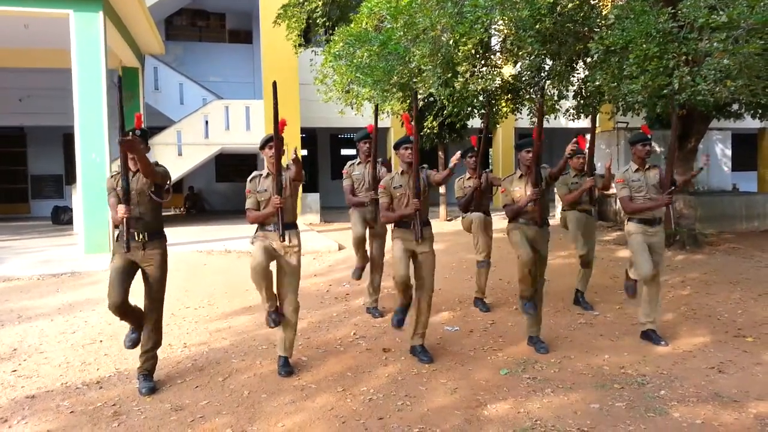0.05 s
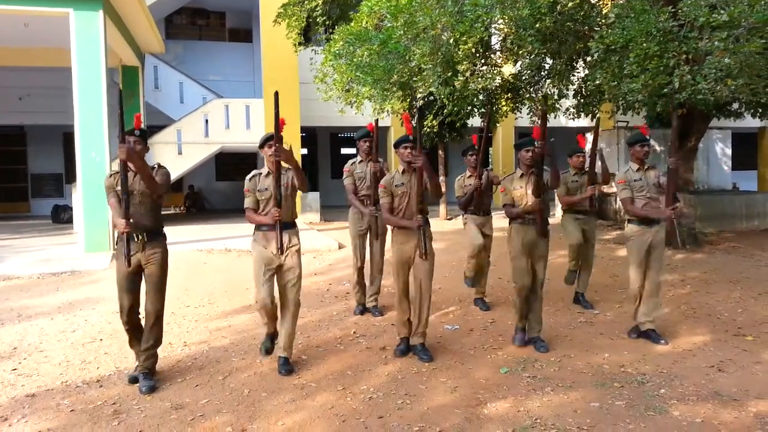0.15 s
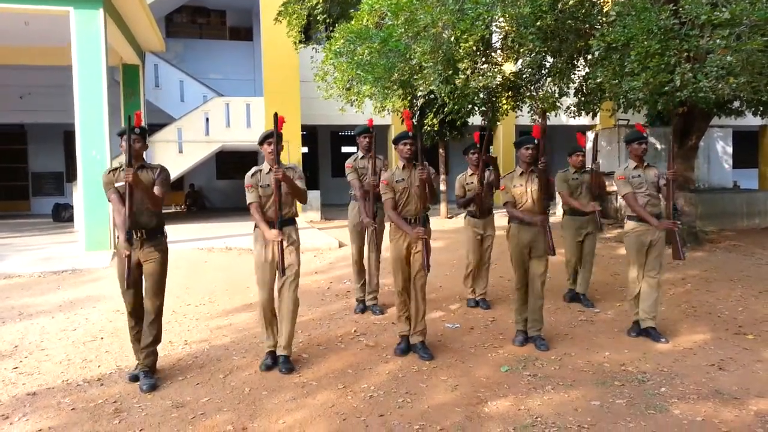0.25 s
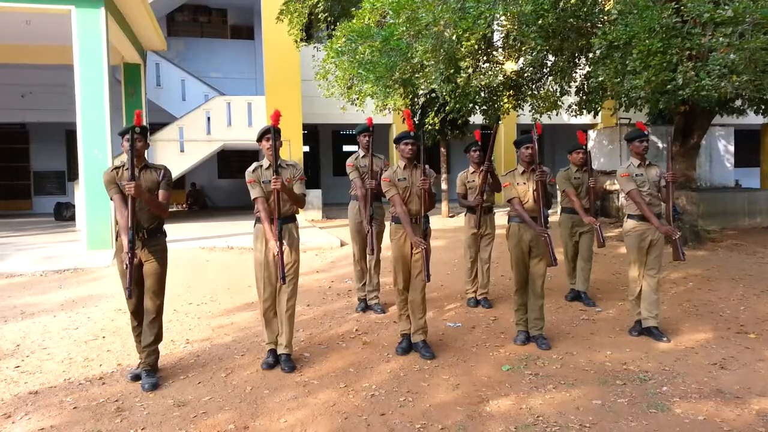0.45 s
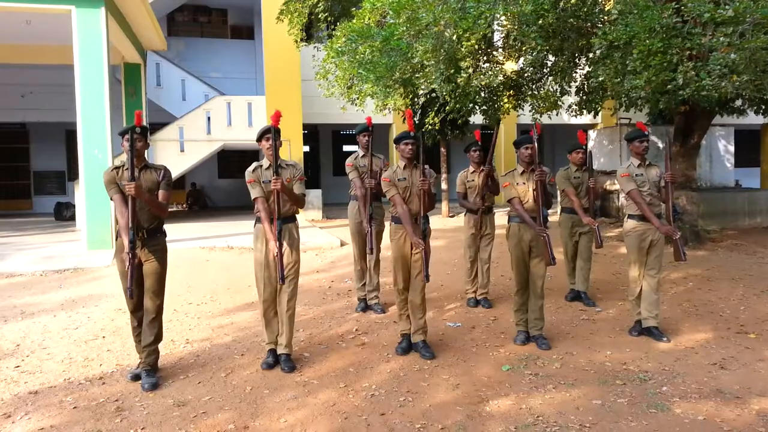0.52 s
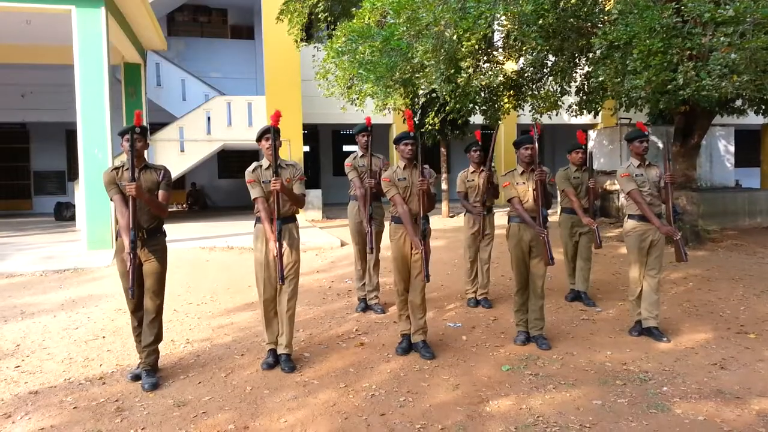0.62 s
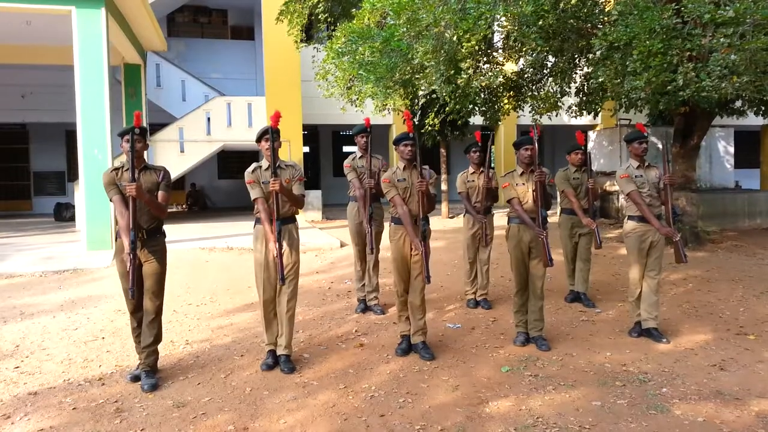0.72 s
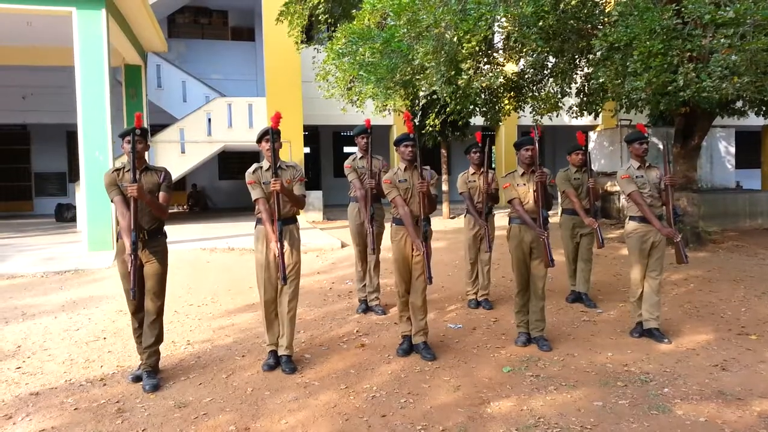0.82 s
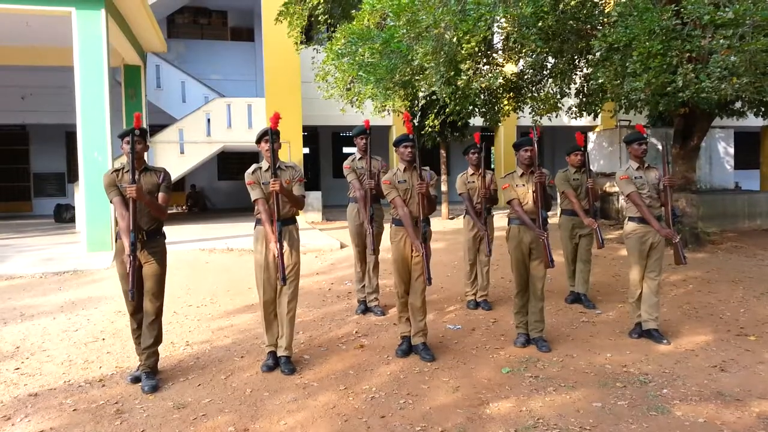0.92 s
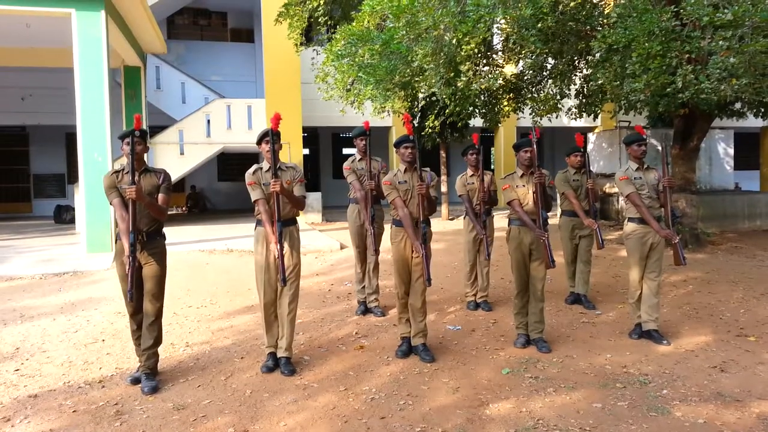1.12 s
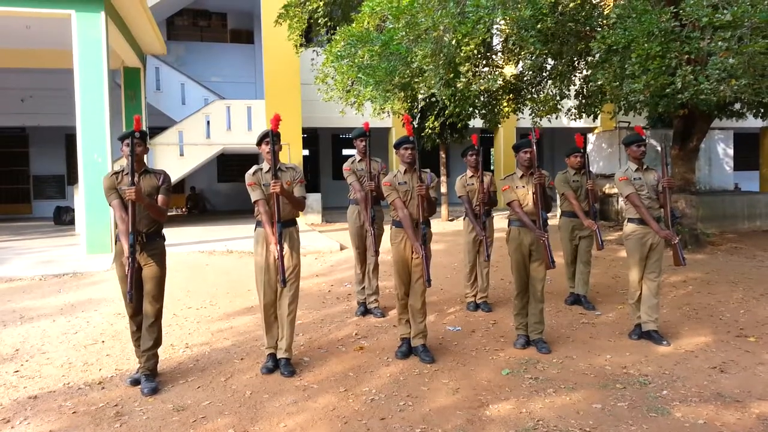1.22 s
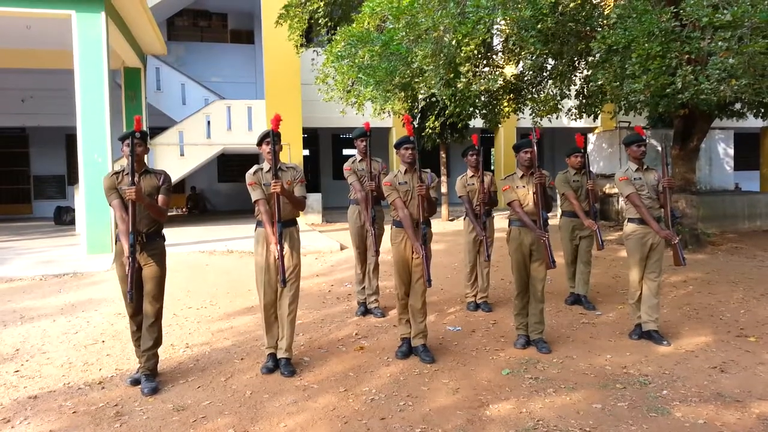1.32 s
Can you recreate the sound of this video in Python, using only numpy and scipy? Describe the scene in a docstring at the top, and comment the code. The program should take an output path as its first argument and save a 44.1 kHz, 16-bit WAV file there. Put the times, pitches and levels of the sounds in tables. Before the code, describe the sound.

At about 0.2 seconds, several boots scuff the dirt and land in one ragged stamp, thudding and crunching grit for a tenth of a second. The yard rings briefly, with a soft echo near 0.4 seconds. Faint rifle clicks and sleeve rustles follow until 0.9 seconds. Low wind puffs buffet the microphone's left side from 0.3 to 0.6 seconds, then weaker ones trail into a faint outdoor hush by 1.3 seconds.

```python
"""Over a faint outdoor hush, a drill squad's soles scuff a dirt yard at 0.2 s, cracking pebbles.
The boots land in one ragged stamp, each ringing earth and sole, slapping out air and crushing grit.
The yard rings briefly and the school front throws the stamp back 0.2 s later, as puffs of air buffet
the left microphone port. Rifle fittings click and sleeves rustle while the squad settles.
A few weak puffs trail off into the hush."""
import sys
import numpy as np
from scipy import signal
from scipy.fft import rfft, irfft
from scipy.io import wavfile

SR = 44100
rng = np.random.default_rng(int(sys.argv[2]) if len(sys.argv) > 2 else 0)


def dump(signal):
    """Clip the signal to [-1, 1] and save it as 16-bit WAV at the path in sys.argv[1]."""
    limited = np.clip(np.atleast_2d(signal).T, -1, 1)
    pcm = np.round(limited * 32767).astype(np.int16)
    wavfile.write(sys.argv[1], SR, pcm)


N = 59535
T = np.arange(N) / SR

# Boot blows. Each row: start in seconds, thud in dB, knock in dB, pitch ratio, slap in dB, grit in dB.
BOOT_BLOWS = [(0.2135, -10.5, -12.5, 0.91, -19, -30.5), (.2165, -8.5, -14, 1.0, -17.5, -29),
              (.2332, -21.5, -24, 1.1, -21.5, -26.5), (.2384, -18.5, -26, .95, -23.5, -21),
              (.2519, -14, -19.5, 1.0, -19, -23), (.2579, -22, -18, 1.2, -20, -43),
              (.2611, -17, -16, 1.08, -23.5, -36.5), (.2698, -18, -18.5, 1.12, -28, -31.5),
              (.2932, -23, -22.5, 1.0, -17, -30.5), (0.2953, -13.5, -20.5, 1.02, -28, -44),
              (.2990, -14.5, -27.5, 0.82, -38, -43)]
# Earth's thud and sole's knock. Each row: frequency in Hz at pitch ratio 1, level in dB, T60 in seconds.
EARTH_MODES = [(216, -8.5, 0.05), (286, 1, .025), (434, -4, 0.019)]
SOLE_MODES = [(634, 0.5, 0.035), (821, -3.5, 0.04), (1303, -18.5, 0.088), (1490, -15.5, 0.043)]
# Air slap and grit spectra. Each row: frequency in Hz, relative level in dB.
SLAP_SPECTRUM = [(100, -12), (220, -2), (480, 2.5), (680, 0), (950, -4.5), (1200, -7), (2000, -8),
                 (3000, -23), (8000, -48.5)]
GRIT_SPECTRUM = [(200, -10), (900, -1.5), (2400, -3.5), (4000, 0.5), (6300, -1.5), (8000, -2.5),
                 (10500, -6.5), (15000, -21)]
GRIT_WIDTH = 0.95


def boots(slap_t60_s=0.054, grit_t60_s=0.099, grain_spread_db=2.5, grain_samples=16):
    """Each blow rings earth and sole, slaps out the air and crushes grit."""
    thud = slap_power = grit_power = 0
    for start, thud_db, knock_db, pitch, slap_db, grit_db in BOOT_BLOWS:
        thud += amp(thud_db) * ring(EARTH_MODES, start, pitch)
        thud += amp(knock_db) * ring(SOLE_MODES, start, pitch)
        slap_power += (amp(slap_db) * fade(start, slap_t60_s)) ** 2
        grit_power += (amp(grit_db) * fade(start, grit_t60_s)) ** 2
    grain_db = grain_spread_db * rng.standard_normal(N // grain_samples + 1)
    grains = amp(np.repeat(grain_db, grain_samples)[:N])
    crunch = np.sqrt(grit_power / np.mean(grains ** 2)) * grains * stereo_noise(GRIT_WIDTH) * pan(1)
    slap = colour(np.sqrt(slap_power) * stereo_noise(width=0.32), SLAP_SPECTRUM)
    return highpass(thud + slap, hz=168) + colour(crunch, GRIT_SPECTRUM)


# Skimming soles. Each row: start in seconds, length in seconds, level in dB.
SOLE_SKIMS = [(0.1973, 0.02, -23.5), (0.203, 0.0046, -19), (0.2134, 0.002, -24)]
# Cracking pebbles. Each row: start in seconds, level in dB.
PEBBLE_CRACKS = [(0.2022, -3), (0.2045, -5), (.2110, -6), (0.2506, -14), (0.2533, -10)]
# Scuff spectrum. Each row: frequency in Hz, relative level in dB.
SCUFF_SPECTRUM = [(200, -13), (900, -9), (2600, -17), (3900, -7.5), (6200, 0.5), (7800, -3), (9500, -15),
                  (15000, -27.5)]


def scuffs():
    """Soles skim the dirt before landing, with sharp cracks where a pebble catches."""
    push = sum(amp(db) * swell(start, length) for start, length, db in SOLE_SKIMS)
    cracks = sum(amp(db) * snap(start) for start, db in PEBBLE_CRACKS)
    return colour(push * stereo_noise(GRIT_WIDTH) + cracks, SCUFF_SPECTRUM) * pan(-5)


# Rifle fittings. Each row: start in seconds, level in dB, low cutoff in Hz.
FITTING_CLICKS = [(.2389, -13.5, 1500), (.2416, -15.5, 2950), (.4006, -28, 5500), (.5980, -29.5, 2500),
                  (.6530, -25, 4600), (.8338, -33, 6540)]
# Click spectrum. Each row: frequency in Hz, relative level in dB.
CLICK_SPECTRUM = [(500, -17), (1500, 5), (3000, -4), (5000, -2), (6500, -2.5), (9700, -2), (11500, -8),
                  (15000, -21)]
RIFLE_PAN_DB = -2.5


def rifles(snap_db=13.5, click_t60_s=0.004, rattle_db=-18.5, rattle_t60_s=0.037):
    """Dry metal ticks, each with a faint rattle; smaller fittings ring higher."""
    noise = stereo_noise(width=0.99)
    ticks = 0
    for start, db, low_hz in FITTING_CLICKS:
        decay = fade(start, click_t60_s) + amp(rattle_db) * fade(start, rattle_t60_s)
        ticks += amp(db) * highpass(amp(snap_db) * snap(start) + noise * decay, low_hz)
    return colour(ticks, CLICK_SPECTRUM) * pan(RIFLE_PAN_DB)


# Cloth rustles. Each row: start in seconds, length in seconds, level in dB.
CLOTH_RUBS = [(0.49, 0.1, -45), (0.58, 0.12, -47.5), (0.833, .04, -54.5)]


def sleeves():
    """Sleeves and slings hiss softly against the settling rifles."""
    rub = sum(amp(db) * swell(start, length) for start, length, db in CLOTH_RUBS)
    return colour(rub * stereo_noise(GRIT_WIDTH) * pan(RIFLE_PAN_DB), GRIT_SPECTRUM)


# Yard reverberation. Each row: frequency in Hz, tail level in dB, T60 in seconds.
YARD_TAIL = [(90, -19, 1), (250, -8, 0.88), (604, -7, 0.72), (1220, -3.5, 0.72), (2580, -1, 0.76),
             (6100, -6.5, 0.78), (13000, -11, 0.91)]


def yard(dry, build_s=0.0065, echo_delay_s=0.2, echo_t60_s=0.033, echo_db=-16):
    """Scattered reflections die away band by band; the school front returns one smeared echo."""
    spectrum = rfft(diffuse_noise())
    hz = np.arange(1, N // 2 + 2) * SR / N
    tail = 0
    for centre_hz in 62.5 * 2 ** np.arange(9):
        octave = irfft(spectrum * np.maximum(1 - abs(np.log2(hz / centre_hz)), 0), N)
        t60_s = lookup(YARD_TAIL, centre_hz, column=2)
        decay = fade(0, t60_s) * (1 - np.exp(-T / build_s))
        tail += amp(lookup(YARD_TAIL, centre_hz)) * octave * decay / np.linalg.norm(decay)
    smear = fade(echo_delay_s, echo_t60_s)
    echo = amp(echo_db) * diffuse_noise() * smear / np.linalg.norm(smear)
    return signal.fftconvolve(dry, tail + echo, axes=1)[:, :N]


# Puffs of air. Each row: start in seconds, length in seconds, level in dB, centre frequency in Hz.
AIR_PUFFS = [(0.107, 0.037, -42.5, 126.2), (0.341, .04, -23, 145), (0.375, 0.036, -18.5, 189.4),
             (0.394, 0.042, -20, 150), (0.433, 0.0197, -25.5, 165), (0.447, 0.00825, -14, 203.3),
             (0.455, 0.0252, -22, 190.1), (0.478, 0.043, -34, 170), (0.568, 0.026, -33, 146.6),
             (.582, 0.0092, -18, 169.5), (0.59, 0.017, -24, 194.5), (0.642, .016, -38, 115),
             (0.926, 0.093, -48, 160), (0.998, 0.011, -35, 129.3), (1.165, 0.011, -33, 165),
             (1.2, 0.019, -40, 156), (1.272, 0.01, -39.5, 137)]


def puffs(wander_hz=217, spread_octaves=0.55, flicker_db=3.5, right_db=-28.5):
    """Eddies flutter unevenly at the left microphone port and barely reach the right one."""
    warped_s = np.cumsum(2 ** (spread_octaves * wander(wander_hz)), axis=1) / SR
    flutter = sum(amp(db) * tone(swell(start, length), hz * warped_s)
                  for start, length, db, hz in AIR_PUFFS)
    flicker = amp(flicker_db * wander(wander_hz))
    return lowpass(np.sqrt(2) * flutter * flicker, hz=500) * amp([[0], [right_db]])


# Hush spectrum. Each row: frequency in Hz, relative level in dB.
HUSH_SPECTRUM = [(18, -48), (30, -27), (43, -3), (102, 2), (222, -5.5), (426, -6), (774, -9), (1440, -13),
                 (6530, -18.5), (13900, -27.5), (15000, -30)]
# Hush envelope. Each row: time in seconds, level in dB.
HUSH_LEVELS = [(0, -48), (.18, -47.5), (.9, -50), (1.35, -49.5)]


def hush():
    """Faint leaves and distant outdoor noise."""
    times_s, levels_db = np.array(HUSH_LEVELS).T
    return colour(diffuse_noise(), HUSH_SPECTRUM) * amp(np.interp(T, times_s, levels_db))


# Width of diffuse sound. Each row: frequency in Hz, side-to-mid ratio in dB.
DIFFUSE_WIDTH = [(100, -2), (300, -11), (700, -4.5), (1400, 0.5), (12000, -1)]


def diffuse_noise():
    """White noise from all around: the channels are partly alike in the lows, unrelated in the treble."""
    mid, side = rfft(rng.standard_normal((2, N)))
    width = amp(lookup(DIFFUSE_WIDTH, np.arange(len(mid)) * SR / N))
    return irfft(np.array([mid + width * side, mid - width * side]) / np.hypot(1, width), N)


def stereo_noise(width):
    """White noise with the given side-to-mid ratio."""
    mid, side = rng.standard_normal((2, N))
    return np.array([mid + width * side, mid - width * side]) / np.hypot(1, width)


def wander(hz):
    """Smooth random drift of unit spread, unrelated at the two ports."""
    drift = lowpass(rng.standard_normal((2, N)), hz)
    return drift / drift.std()


def snap(start, left_lag_s=0.00004):
    """An instant impact that reaches the right port just before the left."""
    age_samples = (T - start - np.array([[left_lag_s], [0]])) * SR
    return np.sinc(age_samples) * np.exp(-(age_samples / 8) ** 2)


def ring(modes, start, pitch):
    """Damped modes struck at one moment."""
    return sum(amp(db) * tone(fade(start, t60), hz * pitch * (T - start)) for hz, db, t60 in modes)


def tone(envelope, cycles):
    """A sine under an envelope."""
    return envelope * np.sin(2 * np.pi * cycles)


def fade(start, t60_s):
    """Sudden start, exponential decay."""
    envelope = np.zeros(N)
    live = slice(*np.searchsorted(T, [start, start + 2 * t60_s]))
    envelope[live] = np.exp(-np.log(1000) * (T[live] - start) / t60_s)
    return envelope


def swell(start, length_s):
    """A rounded rise and fall."""
    envelope = np.zeros(N)
    live = slice(*np.searchsorted(T, [start, start + length_s]))
    envelope[live] = np.sqrt(abs(np.sin(np.pi * (T[live] - start) / length_s)))
    return envelope


def colour(x, spectrum):
    """Minimum-phase filter with the given (Hz, dB) shape and unit power gain."""
    gain = amp(lookup(spectrum, np.arange(N + 1) * SR / (2 * N)))
    cepstrum = irfft(np.log(gain / np.sqrt(np.mean(gain ** 2))))
    cepstrum[1:N] *= 2
    cepstrum[N + 1:] = 0
    return irfft(rfft(x, 2 * N) * np.exp(rfft(cepstrum)))[..., :N]


def highpass(x, hz):
    """Second-order high-pass."""
    return signal.sosfilt(signal.butter(2, hz, "high", fs=SR, output="sos"), x + 1e-18)


def lowpass(x, hz):
    """Fourth-order low-pass."""
    return signal.sosfilt(signal.butter(4, hz, fs=SR, output="sos"), x + 1e-18)


def lookup(table, hz, column=1):
    """Interpolate a table column over log frequency."""
    rows = np.array(table, float)
    return np.interp(np.log(hz + 1e-9), np.log(rows[:, 0]), rows[:, column])


def pan(db):
    """Channel gains for a left-over-right balance in dB."""
    return amp([[db / 2], [-db / 2]])


def amp(db):
    """Decibels to gain."""
    return 10 ** (np.asarray(db) / 20)


def scene():
    """The squad in its yard, with air on the microphone."""
    squad = boots() + scuffs() + rifles() + sleeves()
    return squad + yard(squad) + puffs() + hush()


def record(dry):
    """The camera thins the deep bass and cuts the top."""
    low_cut_hz, top_hz = 128, 14600
    top_cut = signal.ellip(8, 0.2, 70, top_hz, fs=SR, output="sos")
    return signal.sosfilt(top_cut, highpass(dry, low_cut_hz))


dry = scene()
out = record(dry)
dump(out)
```